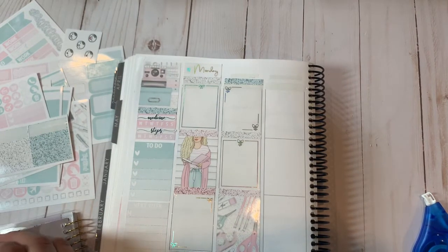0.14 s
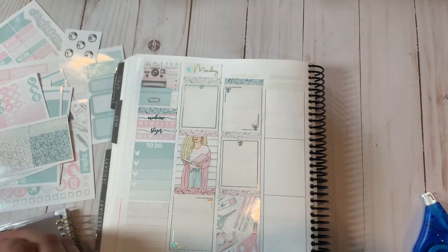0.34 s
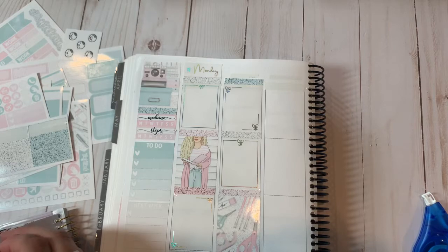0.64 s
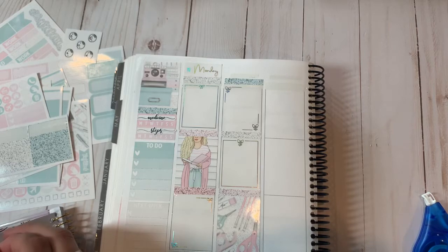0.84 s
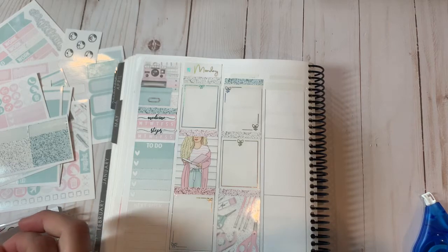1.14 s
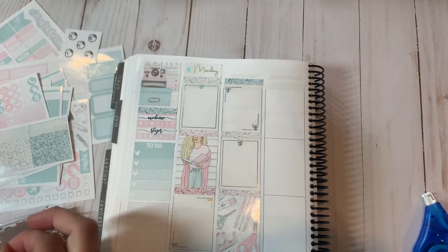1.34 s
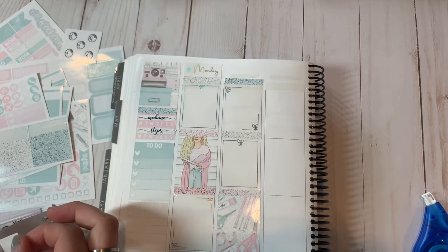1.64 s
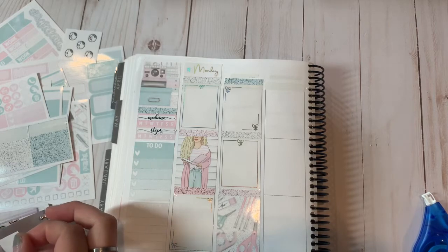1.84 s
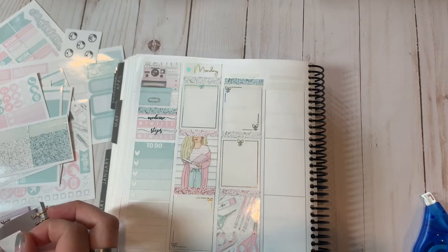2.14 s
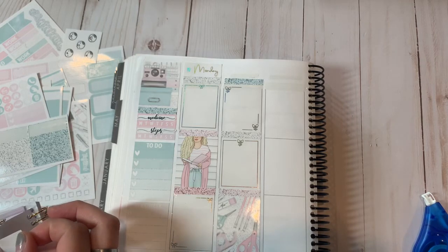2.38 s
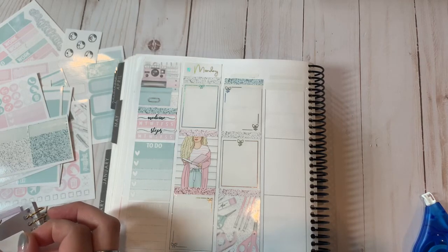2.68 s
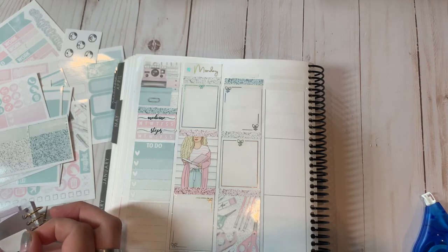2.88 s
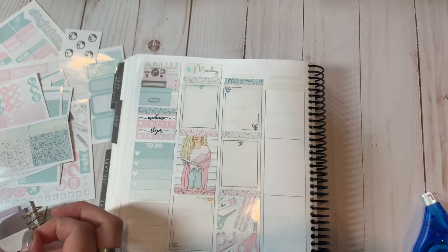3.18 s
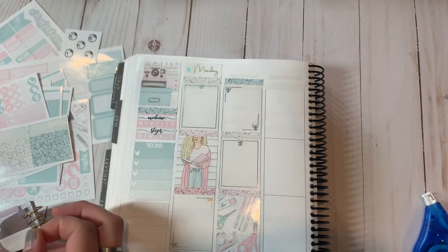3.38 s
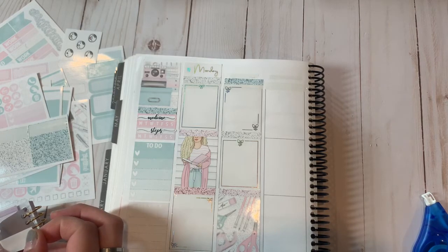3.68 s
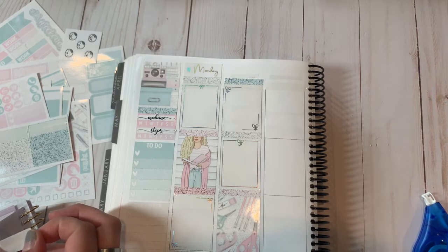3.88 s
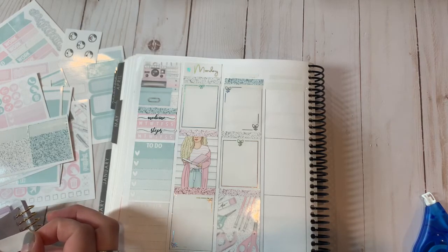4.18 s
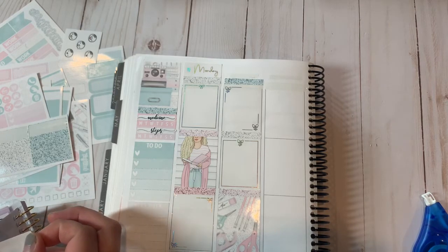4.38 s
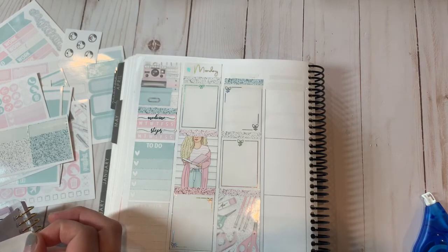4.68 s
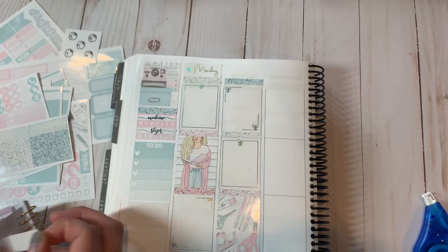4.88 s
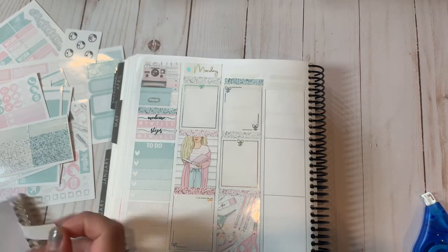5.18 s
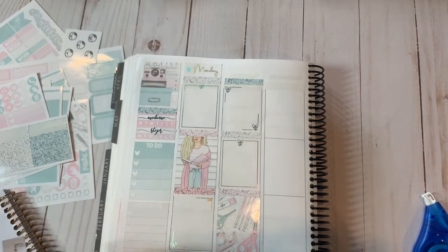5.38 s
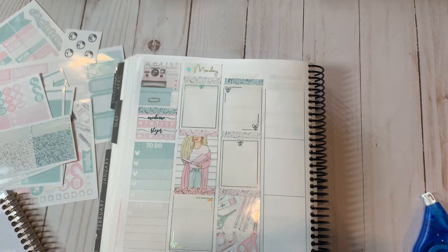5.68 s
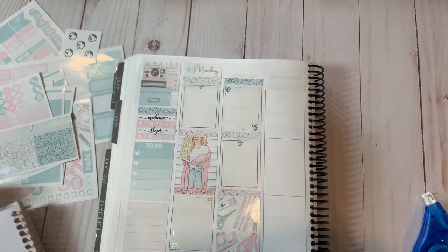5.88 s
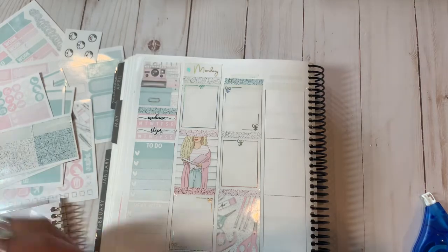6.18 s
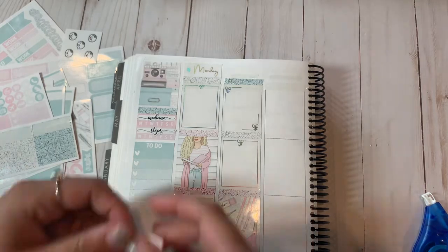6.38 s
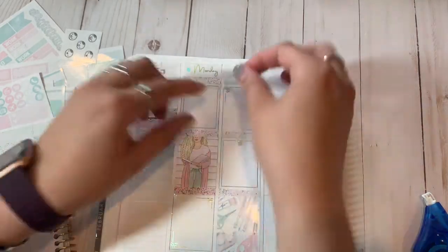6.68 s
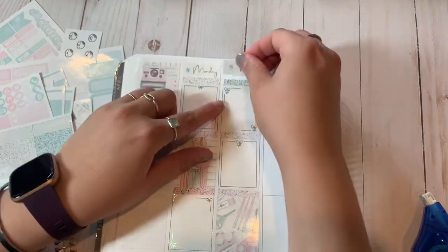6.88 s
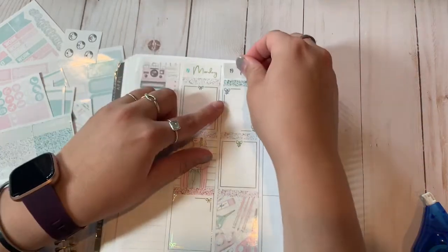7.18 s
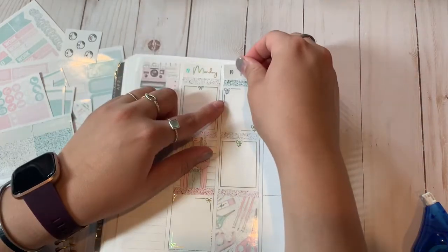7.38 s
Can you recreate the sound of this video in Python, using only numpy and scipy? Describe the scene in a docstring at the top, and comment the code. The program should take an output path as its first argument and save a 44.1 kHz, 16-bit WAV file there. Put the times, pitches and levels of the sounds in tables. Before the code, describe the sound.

Quiet small indoor room with a low rumble and very faint hum, recorded close in stereo. Glue parts in dry, irregular bursts of tiny ticks while a page snaps and knocks, loudest in the first two seconds. After a sharp release near five seconds come paper rubs, an album set down with a woody thud, then delicate fingertip swishes nearer the middle.

```python
"""Paper handled close to a two-port microphone in a quiet room with a low rumble and a faint hum.
At first a sticker is peeled from a small spiral-bound album: glue parts in crackling bursts of tiny slips,
while the stiff page snaps sharply, each snap a dispersed push with two resonances; one frees the sticker.
The album then slides over paper as filtered friction noise and is set down with a clack and a modal thud.
Fingers finally lay the sticker on a planner page, with soft knocks and band-limited swishes."""
import sys
import numpy as np
from scipy import signal
from scipy.fft import rfft, irfft, next_fast_len
from scipy.io import wavfile
from scipy.ndimage import uniform_filter1d

SR = 44100
rng = np.random.default_rng(int(sys.argv[2]) if len(sys.argv) > 2 else 0)


def generate_wav(sig):
    """Save sig (samples, or channels by samples) to the path in sys.argv[1] as 16-bit PCM at SR."""
    pcm = np.round(np.clip(np.atleast_2d(sig).T, -1, 1) * 32767).astype(np.int16)
    wavfile.write(sys.argv[1], SR, pcm)


N = 332073
TAPS = 4096  # samples in a filter or a bend of the page


def amp(db):
    """Logarithmic level: decibels to gain."""
    return 10 ** (np.asarray(db) / 20)


def evened(x):
    """Power normalisation: scales to rms 1."""
    return x / np.sqrt(np.mean(x ** 2) + 1e-20)


def read(points, hz):
    """Logarithmic pitch axis: interpolates a table over log frequency."""
    table_hz, value = np.transpose(points)
    return np.interp(np.log(hz + 1), np.log(table_hz + 1), value)


def bins(size):
    """Discrete spectrum: the bin frequencies in Hz for that many samples."""
    return np.fft.rfftfreq(size, 1 / SR)


def peak(hz, centre_hz, width_hz):
    """Resonance curve: a Lorentzian of height 1 with this half width."""
    return 1 / (1 + ((hz - centre_hz) / width_hz) ** 2)


def add(mix, start_s, sound):
    """Superposition: adds a sound to the mix, in place, at its start time."""
    part = mix[max(round(start_s * SR), 0):][:len(sound)]
    part += sound[:len(part)]


def causal(db):
    """Minimum phase: folding the cepstrum makes a spectrum of these levels ring only after its cause."""
    cepstrum = irfft(np.log(amp(db)))
    cepstrum[1:TAPS // 2] *= 2
    cepstrum[TAPS // 2 + 1:] = 0
    return np.exp(rfft(cepstrum))


def colour(x, points):
    """Linear filtering: shapes a sound by a spectrum table, keeping the power of white noise."""
    ring = irfft(causal(read(points, bins(TAPS))))
    return signal.oaconvolve(x, ring / np.linalg.norm(ring))[:len(x)]


# likeness of the two ports in diffuse sound: pitch_hz [Hz], likeness [correlation, 0 to 1]
PORT_LIKENESS = [(30, 0.65), (130, 0.89), (290, 0.37), (640, 0.12), (1400, 0.15), (16000, 0.019)]


def diffuse(count):
    """Diffuse-field coherence: noise from all sides is most alike at both ports in the bass."""
    hz, _, spectra = signal.stft(rng.standard_normal((2, count)), SR, nperseg=1024, noverlap=768)
    same = np.clip(read(PORT_LIKENESS, hz), -1, 1)[:, None]
    right = same * spectra[0] + np.sqrt(1 - same ** 2) * spectra[1]
    pair = np.array([spectra[0], right])
    return signal.istft(pair, SR, nperseg=1024, noverlap=768)[1][:, :count]


# relative spectrum of the room background: pitch_hz [Hz], level_db [dB]
BACKGROUND = [(20, -30.5), (35, -15), (55, -1.5), (90, -3), (160, -8.5), (290, -17), (430, -17),
              (780, -28.5), (1200, -26), (2000, -42), (4000, -44), (10500, -46), (11900, -55), (13400, -43),
              (15500, -59.5)]
# left-right difference of the background: pitch_hz [Hz], difference_db [dB]
BACKGROUND_BALANCE = [(30, -4), (110, -2.5), (250, 0), (16000, 1.5)]


def background():
    """Stationary noise: a low steady rumble of the room and faint hiss."""
    hz = bins(N)
    tilt = read(BACKGROUND_BALANCE, hz) / 2
    level_db = read(BACKGROUND, hz) + np.array([tilt, -tilt])
    air = irfft(rfft(diffuse(count=N)) * amp(level_db), N)
    return amp(-60) * evened(air)


def drone():
    """Narrow-band noise: a faint, slightly unsteady hum, alike at both ports."""
    band = peak(bins(N), centre_hz=434, width_hz=6.3)
    return amp(-77.5) * evened(irfft(rfft(rng.standard_normal(N)) * band, N))


def strokes(rows, attack_s, sag_db_per_s, release_db_per_s):
    """Envelope: each hand move takes hold, may slacken a little, and dies away exponentially."""
    t, gain = np.arange(SR) / SR, np.zeros(N)
    for start_s, length_s, level_db in rows:
        release_db = release_db_per_s * np.maximum(t - length_s, 0)
        fade = amp(level_db - sag_db_per_s * t - release_db)
        add(gain, start_s, np.minimum(t / attack_s, 1) * fade)
    return gain


def crackle(slips_per_s, size_db, hiss, burst_db):
    """Stick-slip friction: tiny slips of unequal size in bursts of a few milliseconds, over a fine hiss."""
    bursts = uniform_filter1d(rng.standard_normal(N), size=260)
    bursts = evened(uniform_filter1d(bursts, size=140))
    rate = amp(burst_db * bursts)
    slips = rng.random(N) < slips_per_s / SR * rate / rate.mean()
    size = amp(size_db * np.minimum(rng.exponential(1, N), 3.5)) * slips
    u = np.arange(200) / (0.00011 * SR)  # time in units of one slip's rise, 0.11 ms
    power = signal.oaconvolve(size ** 2, u ** 2 * np.exp(-2 * u))[:N]
    power = np.maximum(power, 0)
    power = power / power.mean() + hiss ** 2
    # the running mean evens out slow changes of level, for an rms near 1
    return rng.standard_normal(N) * np.sqrt(power / uniform_filter1d(power, size=3000))


def wander(x, depth_db):
    """Drifting resonance: the bending sheet lifts and lowers patches of the spectrum in turn."""
    _, _, spectrum = signal.stft(x, SR, nperseg=256)
    patches = uniform_filter1d(rng.standard_normal(spectrum.shape), size=5, axis=0)
    patches = evened(uniform_filter1d(patches, size=30, axis=1))
    return signal.istft(spectrum * amp(depth_db * patches), SR, nperseg=256)[1][:N]


# moves in which paper slides on paper: start_s [s], length_s [s], level_db [dB]
SLIDE_MOVES = [(0.035, 0.083, -70), (5.06, .11, -63), (5.195, 0.067, -55.5), (5.29, .12, -67.5),
               (5.555, 0.19, -64.5), (5.79, .1, -66.5), (5.9, 0.16, -68.5), (6.28, 0.068, -71),
               (6.52, 0.061, -68.5), (6.835, 0.027, -73.5)]
# spectrum of paper rubbing on paper: pitch_hz [Hz], level_db [dB]
PAPER_COLOUR = [(100, -1), (400, 6.5), (700, -4.5), (1100, -6.5), (1800, 4.5), (2800, -2.5), (4200, -3.5),
                (7000, -5.5), (10000, -10.5), (12000, -5), (14000, -16), (16000, -22)]


def sliding():
    """Sliding friction: the album and the sticker rub over paper."""
    slips = crackle(slips_per_s=350, size_db=2.5, hiss=0.86, burst_db=3.5)
    rub = wander(colour(slips, PAPER_COLOUR), depth_db=-1.5)
    return strokes(SLIDE_MOVES, attack_s=0.0052, sag_db_per_s=0, release_db_per_s=160) * rub


def contact(strength_db, push_db, corner_hz):
    """Contact force spectrum: a push on the whole sheet lifts the bass, a soft contact loses treble."""
    hz = bins(TAPS)
    bass_db = push_db / (1 + (hz / 1010) ** 4)  # the sheet moves as a whole below 1010 Hz
    loss_db = 15 * np.log2(np.hypot(1, hz / corner_hz))  # nears 15 dB per octave above the corner
    return strength_db + bass_db - loss_db


# colour of the page, with its main bending resonance: pitch_hz [Hz], level_db [dB]
PAGE_COLOUR = [(40, -31.5), (120, -13.5), (260, -2.5), (400, -5.5), (500, -2), (630, 6), (780, 1.5),
               (950, -4), (1200, 1), (1650, -1.5), (2100, 1.5), (15000, -0.5), (16800, -19.5)]


def flex(force_db, spread_s, scatter_hz, travel_s):
    """Bending-wave dispersion: long waves arrive as a clean push, short ones scattered by the edges."""
    t, hz = np.arange(TAPS) / SR, bins(TAPS)
    burst = (t / spread_s) ** 2 * np.exp(-t / spread_s)
    scatter = rfft(rng.standard_normal(TAPS) * burst)
    scatter /= np.sqrt(uniform_filter1d(abs(scatter) ** 2, size=150))
    share = 1 / (1 + (scatter_hz / (hz + 1)) ** 4)
    push = np.exp(-2j * np.pi * hz * spread_s)
    # the treble arrives first; travel_s is the delay at 1 kHz
    dispersion = np.exp(-4j * np.pi * travel_s * np.sqrt(hz * 10 ** 3))
    body = causal(force_db + read(PAGE_COLOUR, hz))
    waves = np.sqrt(share) * scatter + np.sqrt(1 - share) * push
    return irfft(body * dispersion * waves)[:TAPS // 2]


# soft knocks of fingers and pages: start_s [s], strength_db [dB],
# push_db [dB, extra push of the whole sheet], corner_hz [Hz, sharpness]
SOFT_KNOCKS = [(0.038, -16, -4.5, 2370), (0.064, -13.5, -1, 2780), (0.1569, 0.5, -5, 1600),
               (0.164, -1.5, -3.5, 1400), (0.201, -16.5, 4.5, 3000), (0.964, -16, -1.5, 4500),
               (1.0826, -18.5, 0.5, 6000), (1.5011, 10.5, 2.5, 1250), (1.621, -16.5, 12, 2200),
               (2.3117, -7.5, -3, 4200), (3.8087, -8, -3.5, 1400), (5.067, -11.5, 0, 1200),
               (5.118, -15, -6, 4950), (5.154, -13, -5.5, 2430), (5.205, -10, -16, 4970),
               (5.353, -12, -1.5, 3000), (5.394, -18.5, -9, 3020), (5.459, -26, 1, 6010),
               (5.57, -30, 3, 7000), (6.3564, -26, -9, 16200), (6.555, -20.5, -11, 8000),
               (6.641, -19.5, -9, 2200), (6.836, -32.5, 7, 2970), (6.859, -22.5, -3, 5500),
               (6.947, -22.5, 11.5, 600)]
# spectrum shared by all knocks: pitch_hz [Hz], level_db [dB]
KNOCK_SPECTRUM = [(120, -8), (260, -2), (620, 0.5), (3500, -2), (12000, 2)]


def knocks():
    """Soft impact: fingers and page edges bump, with a longer scatter than a snap."""
    out = np.zeros(N)
    for start_s, strength_db, push_db, corner_hz in SOFT_KNOCKS:
        force_db = contact(strength_db, push_db, corner_hz) + read(KNOCK_SPECTRUM, bins(TAPS))
        add(out, start_s, flex(force_db, spread_s=0.00076, scatter_hz=1470, travel_s=.0003))
    return out


# short pulls on the sticker: start_s [s], length_s [s], level_db [dB]
STICKER_PULLS = [(0.15, 0.1, -56), (0.27, 0.082, -50), (0.54, 0.17, -55.5), (0.855, 0.088, -68.5),
                 (0.92, 0.047, -54.5), (1.0, 0.13, -61), (1.14, .13, -60), (1.27, 0.11, -54.5),
                 (1.43, 0.12, -54), (1.75, 0.029, -54), (1.81, 0.16, -61.5), (2.05, 0.053, -54.5),
                 (2.165, 0.19, -57.5), (2.43, 0.1, -64), (2.66, 0.11, -57.5), (2.795, 0.043, -51.5),
                 (2.87, 0.099, -76), (3.11, 0.089, -60.5), (3.21, 0.14, -69.5), (3.41, .15, -61),
                 (3.6, 0.23, -60), (3.84, 0.072, -60.5), (3.91, 0.07, -58), (4.02, 0.1, -62.5),
                 (4.11, 0.054, -54.5), (4.2, 0.097, -53.5), (4.33, 0.082, -55.5), (4.47, 0.083, -61.5),
                 (4.56, .2, -55), (4.79, 0.074, -58.5), (4.855, 0.055, -53)]
# single glue strands that part audibly: start_s [s], level_db [dB, before the glue's colour]
GLUE_TICKS = [(0.2756, -47), (0.5486, -50), (0.5728, -46), (0.605, -43), (0.9308, -49), (0.9562, -48),
              (1.2748, -47), (1.782, -46), (1.8736, -41.5), (2.009, -43.5), (2.0602, -35), (2.105, -43.5),
              (2.179, -44.5), (2.2035, -45.5), (2.237, -39), (2.289, -43), (2.347, -45), (2.367, -43),
              (2.6734, -33), (2.7195, -40), (2.819, -37.5), (2.8705, -45), (3.1212, -47.5), (3.4442, -48.5),
              (3.5954, -44.5), (3.6278, -53), (3.66, -49), (3.6757, -44), (3.7504, -45), (3.9157, -38),
              (4.14, -44.5), (4.2118, -38), (4.243, -39), (4.276, -51), (4.348, -42.5), (4.629, -50),
              (4.6509, -47), (4.86, -44)]
# spectrum of parting glue: pitch_hz [Hz], level_db [dB]
GLUE_COLOUR = [(100, -23), (400, -20), (650, -5.5), (1000, -11), (1900, -4.5), (2900, -3), (4000, -4.5),
               (5200, -6.5), (7800, -3.5), (10000, -1.5), (13500, -2.5), (15500, -10)]


def peeling():
    """Adhesive fracture: glue parts from the backing strand by strand, with a few stronger ticks."""
    slips = crackle(slips_per_s=650, size_db=3.9, hiss=.15, burst_db=7)
    pull = strokes(STICKER_PULLS, attack_s=.018, sag_db_per_s=8, release_db_per_s=321.5)
    glue = pull * slips
    u = np.arange(500) / (0.00073 * SR)  # time in units of a tick's rise, 0.73 ms
    for start_s, level_db in GLUE_TICKS:
        add(glue, start_s, amp(level_db) * u * np.exp(1 - u) * rng.standard_normal(len(u)))
    return wander(colour(glue, GLUE_COLOUR), depth_db=2.95)


# sharp snaps of the page and, in the last two rows, the album cover clacking down, each with two resonances:
# start_s [s], strength_db [dB], push_db [dB, extra push of the whole sheet], corner_hz [Hz, sharpness],
# first_hz [Hz], first_db [dB, height], second_hz [Hz], second_db [dB, height]
SHARP_SNAPS = [(0.3181, 2.5, 2, 23600, 4320, 8.5, 13000, 8.5),
               (0.3574, 0.5, 6, 22000, 9900, 9.5, 1420, 10.5), (0.6537, 3.5, 5, 18600, 9100, 9, 1440, 2.5),
               (0.657, 5.5, 1, 9900, 8150, 6.5, 3400, -3), (1.329, 5, -3, 22210, 3570, 7, 2100, 1.5),
               (1.3304, 1.5, 8.5, 24000, 10000, 3.5, 1040, 9), (1.5406, 5, -1, 20800, 7970, 9.5, 13400, 5),
               (1.544, 3.5, 2, 26130, 3450, 12, 10200, 5), (1.5681, 4.5, 3.5, 16110, 2910, 11.5, 5600, 8.5),
               (1.5926, 1, 7.5, 26000, 2470, 11, 6560, 6), (4.9069, 2.5, -8, 30000, 9400, 6, 6500, 5),
               (4.9098, 2, -6, 24120, 8200, 8.5, 10200, 6), (4.9098, 2, -0.5, 19000, 4300, 12.5, 1700, 13),
               (4.9122, 6, -4.5, 11000, 6500, 8, 3850, 7.5), (6.0459, -1, -27, 10300, 4750, 5, 5700, 7),
               (6.048, 7.5, -12, 2620, 2200, 7.5, 1220, 6)]
# spectrum shared by all snaps: pitch_hz [Hz], level_db [dB]
SNAP_SPECTRUM = [(260, -4), (620, 0.5), (3500, -0.5), (7000, 1.5), (12000, 7.5)]


def snaps(push_share):
    """Sharp impact: page snaps, and the album cover clacking down, each with two resonances and a push."""
    hz, out = bins(TAPS), np.zeros(N)
    for start_s, strength_db, push_db, corner_hz, first_hz, first_db, second_hz, second_db in SHARP_SNAPS:
        first = first_db * peak(hz, first_hz, width_hz=340)
        second = second_db * peak(hz, second_hz, width_hz=340)
        force_db = contact(strength_db, push_share * push_db, corner_hz)
        force_db = force_db + read(SNAP_SPECTRUM, hz) + first + second
        add(out, start_s, flex(force_db, spread_s=0.00041, scatter_hz=1490, travel_s=.0004))
    return out


# blows that reach the table top: start_s [s], level_db [dB, added to the modes' levels]
TABLE_BLOWS = [(1.57, -45.5), (5.7, -54.5), (6.049, -39.5), (6.85, -50)]
# modes of the table top: pitch_hz [Hz], level_db [dB], t60_s [s]
TABLE_MODES = [(82.5, -5.5, 0.33), (129.9, 0.5, 0.22), (149.6, -8, 0.3), (234.7, -13, .16),
               (493, -7.5, 0.21)]


def thuds():
    """Modal decay: the table top booms briefly under each blow as a sum of damped sines."""
    t, out, boom = np.arange(SR // 2) / SR, np.zeros(N), 0
    for pitch_hz, level_db, t60_s in TABLE_MODES:
        boom = boom + amp(level_db - 60 * t / t60_s) * np.sin(2 * np.pi * pitch_hz * t)
    boom = boom * (1 - np.exp(-t / 0.004))  # soft onset
    for start_s, level_db in TABLE_BLOWS:
        add(out, start_s, amp(level_db) * boom)
    return out


# short swishes of page edges and fingertips:
# start_s [s], level_db [dB, envelope peak], pitch_hz [Hz, centre], width_oct [octaves], rise_s [s]
SWISHES = [(5.2, -50.5, 4500, 0.34, 0.018), (5.257, -53.5, 10400, 0.28, 0.0032),
           (5.66, -80.5, 4560, .4, 0.02), (5.802, -61.5, 1775, 0.4, 0.024), (5.8, -64, 9300, 0.8, 0.018),
           (5.92, -68, 13100, .25, 0.0065), (6.274, -63, 9400, 0.11, 0.0032),
           (6.352, -57, 5620, 0.23, 0.002), (6.489, -54, 12100, 0.4, 0.0018), (6.53, -61, 7250, 1, 0.01),
           (6.68, -67, 1825, 0.5, 0.016)]


def scuffs():
    """Band-limited friction: each swish swells and fades in one band of the paper."""
    t, hz, out = np.arange(SR // 2) / SR, bins(SR // 2), np.zeros(N)
    for start_s, level_db, pitch_hz, width_oct, rise_s in SWISHES:
        octaves = np.log2((hz + 1) / pitch_hz)
        band = np.exp(-.5 * (octaves / width_oct) ** 2)
        rub = evened(irfft(rfft(rng.standard_normal(len(t))) * band))
        add(out, start_s, amp(level_db) * rub * t / rise_s * np.exp(1 - t / rise_s))
    return out


# ring of the album's coil and cover as it lands: pitch_hz [Hz], level_db [dB]
COIL_COLOUR = [(100, -27), (550, -6.5), (800, -13), (1050, -14), (1500, -6), (2150, -11), (2700, -9),
               (3200, -27), (4400, -38), (8000, -24), (16000, -43)]


def landing(start_s, level_db, t60_s):
    """Impact excitation: the album's coil shivers, as decaying noise, when it meets the table."""
    t, out = np.arange(SR // 2) / SR, np.zeros(N)
    shiver = rng.standard_normal(len(t)) * amp(level_db - 60 * t / t60_s)
    add(out, start_s, colour(shiver, COIL_COLOUR))
    return out


# how the two ports hear the hands: pitch_hz [Hz], phase_rad [radians by which the left leads]
HAND_PHASE = [(0, 0), (2000, 3.4), (4000, 6.4), (5400, 9.1), (7600, 11.3), (8500, 9.4), (15000, -3.1),
              (17400, -5)]
# level difference of the ports for the hands: pitch_hz [Hz], difference_db [dB, left minus right]
HAND_BALANCE = [(100, -4), (600, 4), (1100, 6), (2000, 0), (3100, 7), (4300, 2), (5400, -5), (6600, -18.5),
                (8200, 5.5), (14000, -2), (16000, -6.5)]


def ports(x, side):
    """Interaural cues: ports differ in phase and level, the more so the further to the side a sound is."""
    size = next_fast_len(N + TAPS)
    hz = bins(size)
    phase_rad = side * np.interp(hz, *np.transpose(HAND_PHASE))
    half = amp(side * read(HAND_BALANCE, hz) / 2) * np.exp(.5j * phase_rad)
    pair = np.array([half, 1 / half])
    pair = pair / np.sqrt(np.mean(abs(pair) ** 2, axis=0))
    dip = amp(-9 * peak(hz, centre_hz=12130, width_hz=350))  # narrow dip in the treble near 12 kHz
    return irfft(rfft(x, size) * dip * pair, size)[:, :N]


# where the hands work, moving from the left edge towards the planner:
# start_s [s], side [share of the full left-right difference]
HAND_PLACES = [(0, 1), (5.5, 0.93), (6.25, 0.66)]


def placed(x):
    """Localisation: each stretch of handling is heard from the place where the hands are."""
    starts, sides = np.transpose(HAND_PLACES)
    place = np.searchsorted(starts[1:], np.arange(N) / SR)
    return sum(ports(x * (place == k), side) for k, side in enumerate(sides))


# reverberation time of the small room: pitch_hz [Hz], t60_s [s]
ROOM_DECAY = [(100, 0.47), (600, .42), (2000, 0.42), (5000, 0.39), (9000, 0.33), (14000, 0.4)]
# spectrum of the reflections: pitch_hz [Hz], level_db [dB]
REFLECTION_COLOUR = [(100, 4), (300, 8.5), (700, 0.5), (1600, 1), (4000, 1.5), (8000, 3), (10500, -3.5),
                     (12000, -8), (13500, -4.5), (16000, -14)]


def room(x, early_db, early_t60_s, late_db):
    """Reverberation: quick reflections from the desk and its clutter, then the tail of a small room."""
    hz, t, spectra = signal.stft(diffuse(count=26000), SR, nperseg=256)
    spectra = spectra * amp(read(REFLECTION_COLOUR, hz))[:, None]
    early = amp(early_db - 60 * t / early_t60_s)
    late = amp(late_db - 60 * t / read(ROOM_DECAY, hz)[:, None])
    tail = signal.istft(spectra * np.hypot(early, late), SR, nperseg=256)[1]
    tail *= np.clip(np.arange(tail.shape[1]) / (0.0015 * SR), 0, 1) ** 2  # onset over 1.5 ms
    return signal.fftconvolve(x[None], tail, axes=1)[:, :N]


def echo(x, delay_s, level_db):
    """Specular reflection: one distinct, delayed copy from a nearby wall."""
    out = np.zeros(N)
    add(out, delay_s, amp(level_db) * x)
    return out


def scene():
    """Superposition of direct and reflected sound: hands and album near the microphone, in the room."""
    rubbing = sliding() + peeling() + scuffs()
    direct = placed(knocks() + snaps(push_share=1) + rubbing)
    # a bending page scatters differently in each direction: each wall gets its own knocks and snaps,
    # and half of the snaps' extra push (in dB) carries to the walls
    directions = [knocks() + snaps(push_share=.5) + rubbing for wall in range(4)]
    wet = sum(room(x, early_db=-38.5, early_t60_s=0.07, late_db=-53.5) for x in directions)
    slap = echo(directions[0], delay_s=.0096, level_db=-25.5)
    table = thuds() * amp([[-1], [1]])  # 2 dB stronger on the right
    coil = np.array([landing(start_s=6.05, level_db=-47.5, t60_s=0.44) for port in range(2)])
    return background() + drone() + direct + slap + wet + table + coil


def record(dry):
    """Clipping and band limiting: a hard overload ceiling, then a linear-phase low-pass at 16.6 kHz."""
    held = np.clip(dry, -.85, .85)
    low_pass = signal.firwin(255, 16600, window=("kaiser", 9), fs=SR)
    return signal.oaconvolve(held, low_pass[None], "same")


dry = scene()
out = record(dry)
generate_wav(out)
```